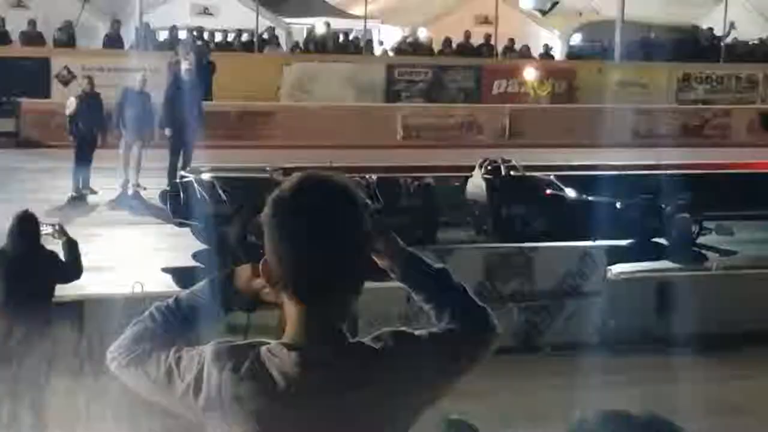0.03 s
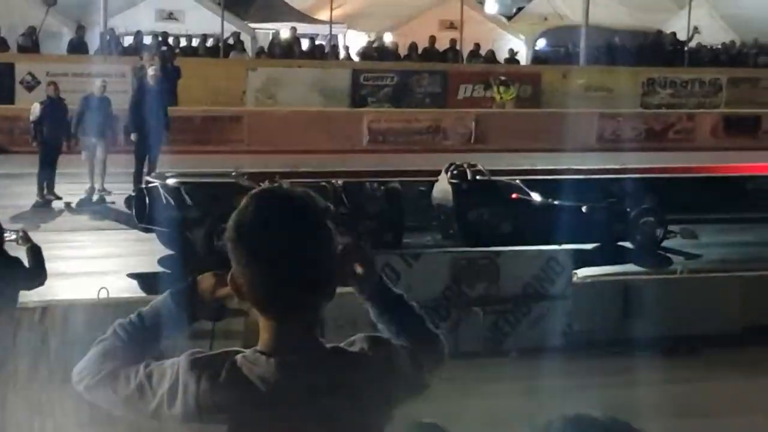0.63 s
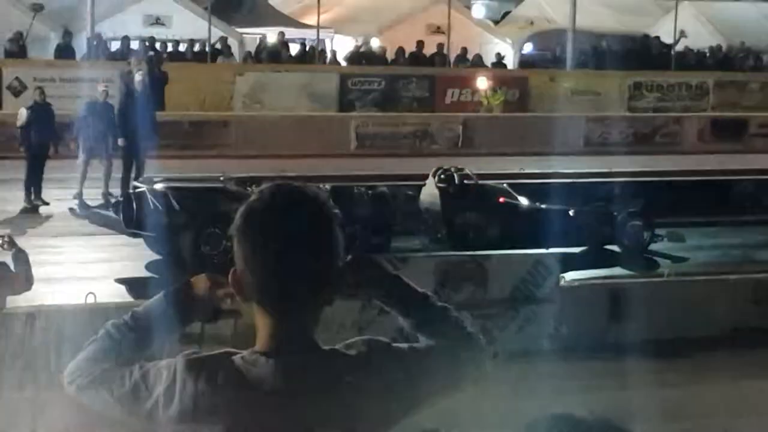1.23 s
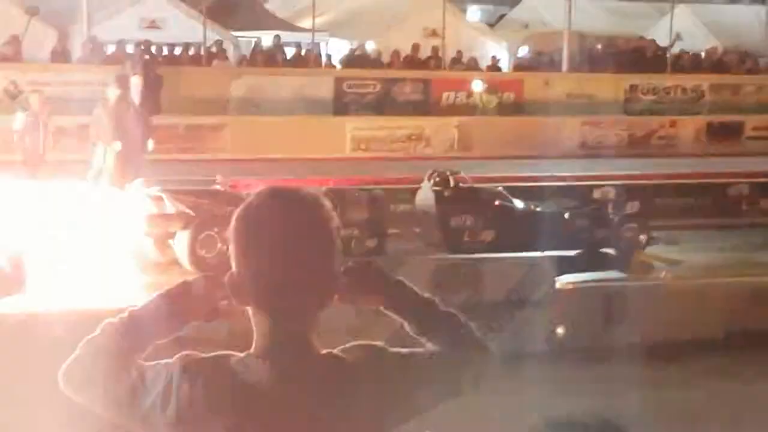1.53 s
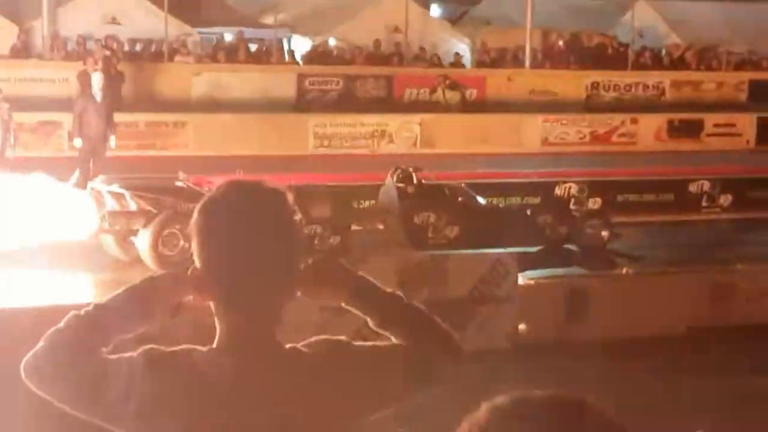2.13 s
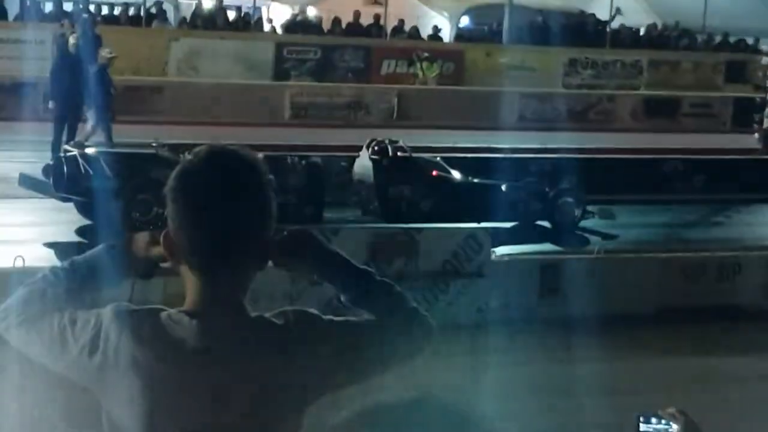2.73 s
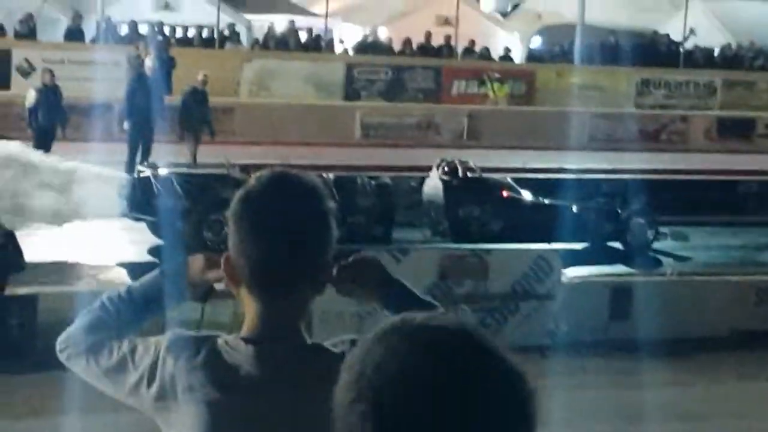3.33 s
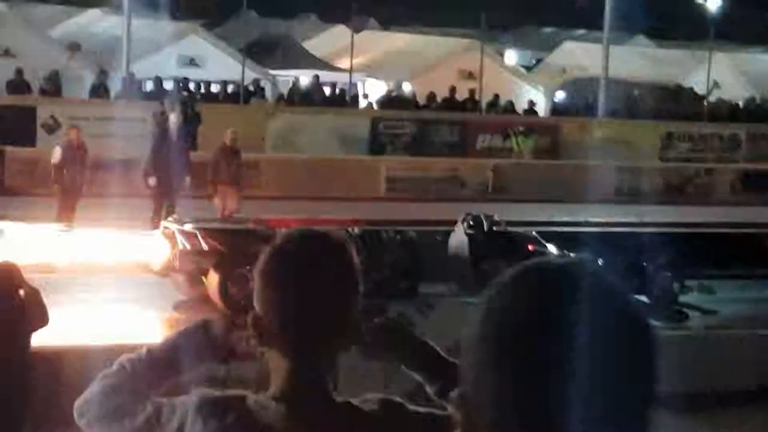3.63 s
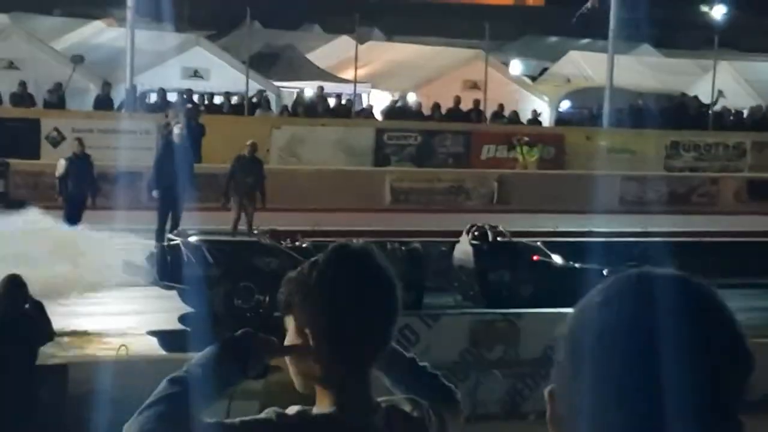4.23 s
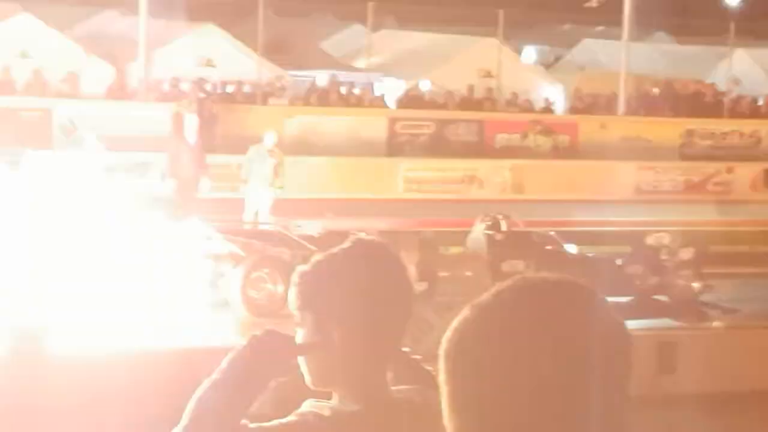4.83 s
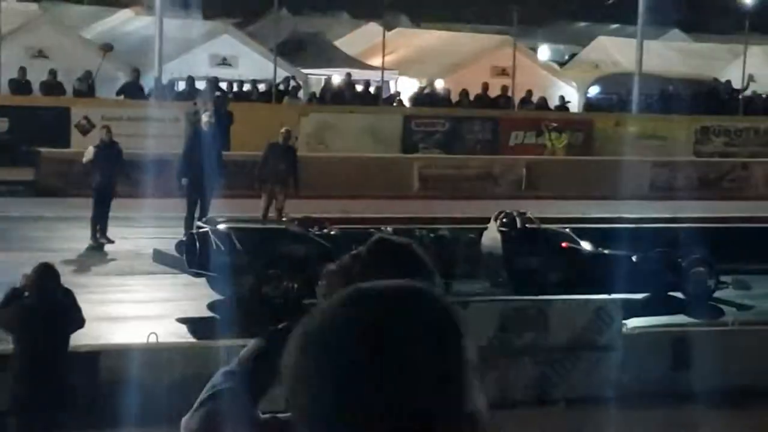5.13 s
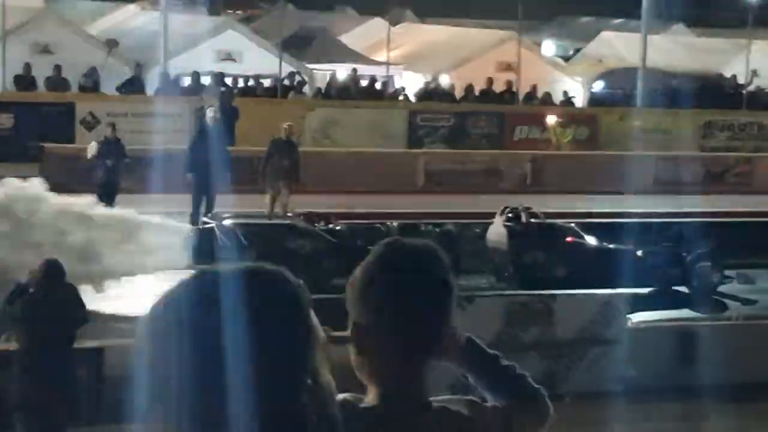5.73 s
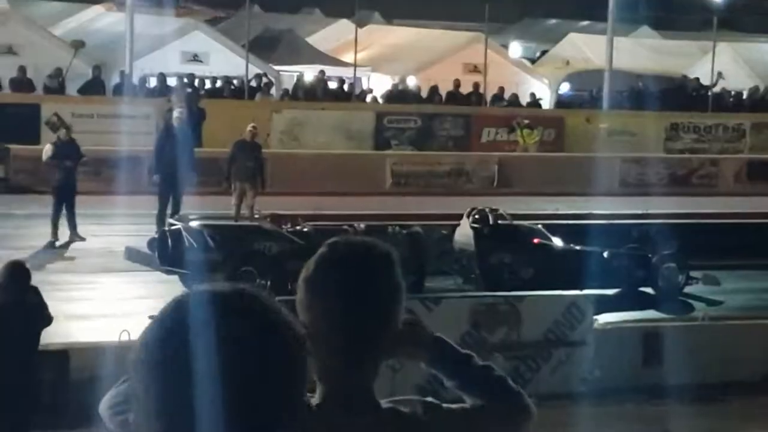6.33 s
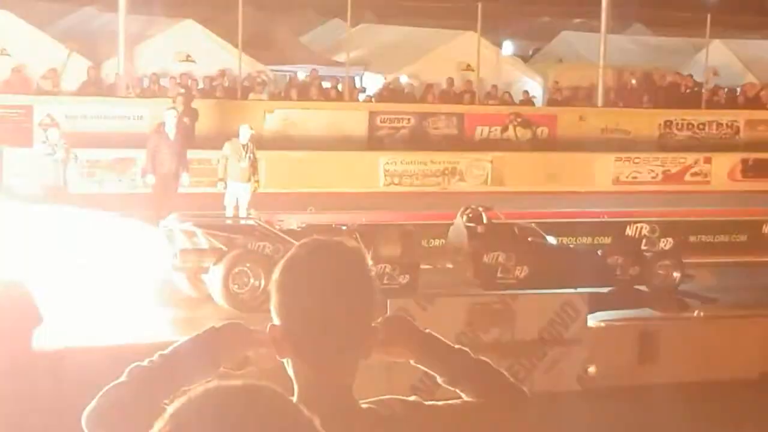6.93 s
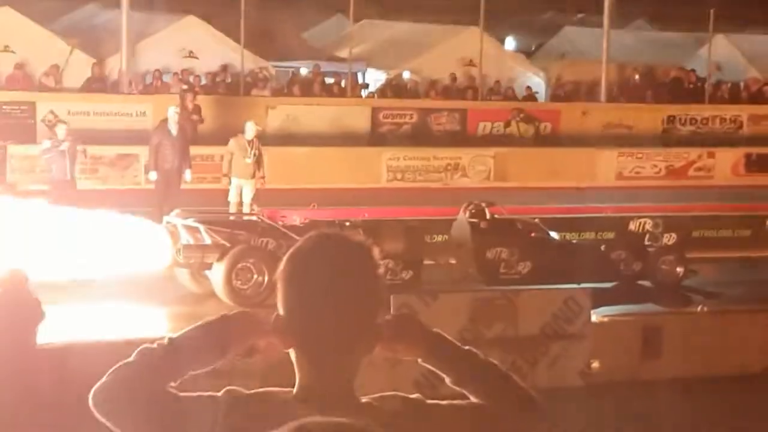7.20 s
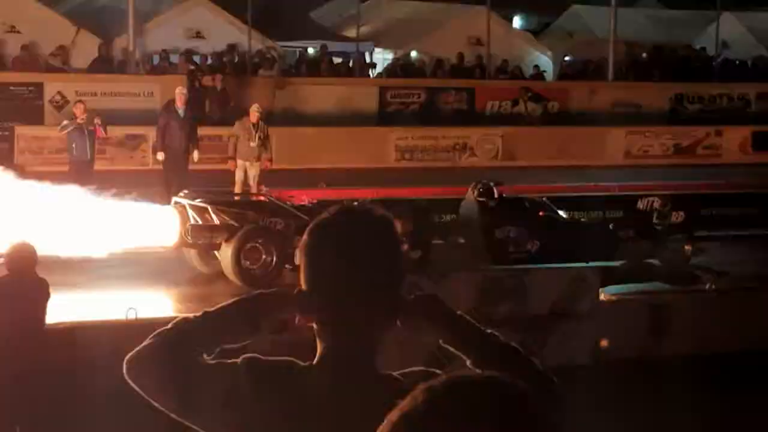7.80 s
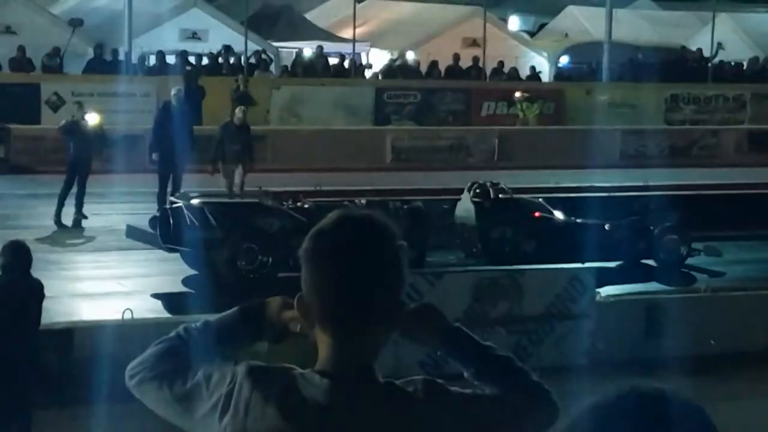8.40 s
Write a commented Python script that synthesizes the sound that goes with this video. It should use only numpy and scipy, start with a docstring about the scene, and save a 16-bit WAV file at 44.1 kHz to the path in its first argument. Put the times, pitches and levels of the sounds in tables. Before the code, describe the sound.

Repeated afterburner booms and throbbing bursts of flame interrupt the piercing whine and rushing exhaust of a jet car outdoors.

```python
"""A jet dragster on the start line at night, from a stereo microphone in the crowd behind the wall.
Its turbine blades whine over the hiss and roar of the exhaust mixing with still air. The afterburner
lights seven times with a bang and a fluttering flame that echoes off the stands; each burn drags the
shaft down. At the end the engine spools up. A limiter on the microphone ducks the bangs."""
import sys
import numpy as np
from scipy import signal
from scipy.fft import rfft, irfft, next_fast_len
from scipy.io import wavfile
from scipy.ndimage import uniform_filter1d, minimum_filter1d

SR = 44100
rng = np.random.default_rng(int(sys.argv[2]) if len(sys.argv) > 2 else 0)


def dump_mix(stems):
    """Bounce the given channels to the path in sys.argv[1] as a 16-bit WAV at rate SR."""
    frames = np.atleast_2d(stems).T  # one column per channel
    limited = np.clip(frames, -1, 1)  # hard clip at full scale
    pcm = np.round(limited * 32767).astype(np.int16)
    wavfile.write(sys.argv[1], SR, pcm)


N = 377496
TIME = np.arange(N) / SR
HZ = np.fft.rfftfreq(N, 1 / SR)


def amp(db):
    """Decibels to gain."""
    return 10 ** (np.asarray(db) / 20)


def read(points, hz):
    """Reads a spectrum on a log-frequency axis."""
    f, value = np.transpose(points)
    return np.interp(np.log(hz + 1), np.log(f + 1), value)


def curves(rows):
    """One control signal per column of a table of times."""
    time_s, *columns = np.transpose(rows)
    return [np.interp(TIME, time_s, column) for column in columns]


def between(first_s, last_s):
    """The samples between two times."""
    return slice(max(round(first_s * SR), 0), round(last_s * SR))


def wander(rate_hz):
    """Smooth random drift with an rms of 1, up to the given rate."""
    count = next_fast_len(N // 32 + 2)
    hz = np.fft.rfftfreq(count, 32 / SR)
    slow = irfft(rfft(rng.standard_normal(count)) / np.sqrt(1 + (hz / rate_hz) ** 4), count)
    drift = np.interp(np.arange(N) / 32, np.arange(count), slow)
    return drift / np.sqrt(np.mean(drift ** 2))


def split(spectrum, hz):
    """The sound below and above a frequency."""
    low = 1 / (1 + (HZ / hz) ** 8)
    return irfft(spectrum * low, N), irfft(spectrum * (1 - low), N)


# How alike the two sides of the microphone hear the car: freq_hz, coherence
MIC_COHERENCE = [(30, .99), (170, .99), (350, .93), (700, .91), (1400, .8), (2800, .66), (6000, .6),
                 (14000, .52)]
# How far the left side leads the right: freq_hz, phase_rad
MIC_PHASE = [(30, .1), (150, .2), (400, .5), (1100, .85), (2100, .3), (3500, 1.1), (6000, .3), (8000, 1.1),
             (14000, 1.2)]

def mic_noise(shape, band_hz):
    """Left and right spectra of noise at the microphone, with an rms of 1 inside the band."""
    left, apart = (rng.standard_normal(len(HZ)) + 1j * rng.standard_normal(len(HZ)) for _ in range(2))
    alike = np.clip(read(MIC_COHERENCE, HZ), 0, 1)
    right = (alike * left + np.sqrt(1 - alike ** 2) * apart) * np.exp(-1j * read(MIC_PHASE, HZ))
    pair = np.array([left, right]) * amp(read(shape, HZ))
    in_band = (HZ > band_hz[0]) & (HZ < band_hz[1])
    return pair / np.std(irfft(pair.mean(0) * in_band, N))


# The exhaust stream from behind the wall: time_s, level_db, roar_relative_db, fizz_relative_db
EXHAUST_LEVELS = [(.2, -31, -1.5, -1.5), (.9, -36, 0.5, -2), (1.15, -37.5, -1.5, -6), (1.5, -38, 0, -5),
                  (2.02, -41, 2.5, -7), (2.18, -34.5, -1.5, -6), (2.38, -36, 2.5, -4),
                  (2.5, -34.5, 3, -2.5), (2.65, -30.5, 0, -6), (3.45, -31.5, 3.5, -4), (3.85, -31.5, 1, -2),
                  (4.4, -31.5, 1.5, -3), (5.2, -35, 1.5, -4), (5.75, -32, 1.5, -3), (6.25, -34, 1, -1.5),
                  (6.55, -32.5, 2.5, -2), (7.5, -33.5, 0, -0.8), (8.1, -31, 2, -3), (8.5, -27.5, 7.5, -0.5)]
# Its eddies, from the largest to the smallest: freq_hz, density_db
HISS_SPECTRUM = [(1530, -41), (2600, -9), (2740, -11.5), (2960, -8), (3690, 0.5), (5350, -3), (5480, -5.5),
                 (5820, -4), (5950, -6), (6930, -5), (7540, -5), (8910, -13), (11000, -12.5),
                 (12000, -13.5), (16000, -18.5)]
IDLE_ROAR_SPECTRUM = [(120, -33), (220, -4.5), (300, -15.5), (420, -6.5), (520, -2.5), (640, -4),
                      (720, -5.5), (1000, -4), (1150, -7.5), (1420, 3.5), (1650, -12.5), (2100, -11.5),
                      (2900, -20), (3900, -56)]
FULL_ROAR_SPECTRUM = [(120, -15), (200, -4.5), (265, -7), (408, -6.5), (479, -3), (621, 1.5), (696, -6.5),
                      (779, 0.5), (892, -4.5), (1210, 0.5), (1590, -0.5), (2470, -8.5), (2900, -17.5),
                      (3000, -27.5), (3900, -49), (6600, -120)]
RUMBLE_SPECTRUM = [(15, -24), (40, -15), (65, -1), (88, 7.5), (115, -1.5), (160, -10.5), (230, -6.5),
                   (330, -20.5), (700, -69)]

def exhaust(speed, swell_db, dip_db, gust_db=0.9, churn_db=1.2):
    """The jet mixes with still air: small eddies hiss, larger ones roar, the largest rumble."""
    level_db, roar_db, fizz_db = curves(EXHAUST_LEVELS)
    hiss, fizz = split(mic_noise(HISS_SPECTRUM, (3200, 5300)), 8700)
    idle = irfft(mic_noise(IDLE_ROAR_SPECTRUM, (1100, 2400)), N)
    deep, bright = split(mic_noise(FULL_ROAR_SPECTRUM, (1100, 2400)), 1150)
    rumble = irfft(mic_noise(RUMBLE_SPECTRUM, (20, 300)), N)
    # the roar broadens as the shaft leaves idle, then loses depth as it spools up
    off_idle = np.clip((speed - 232.4) / 1.8, 0, 1)
    spool_up = np.clip((speed - 236) / 8, 0, 1)
    full = bright + deep * amp(-4 * spool_up)
    roar = np.sqrt(1 - off_idle) * idle + np.sqrt(off_idle) * full
    fizz = fizz / np.std(fizz.mean(0)) * amp(fizz_db - 0.7)
    fine = (hiss + fizz) * amp(gust_db * wander(34) - dip_db)
    coarse = roar * amp(roar_db - 2 + churn_db * wander(26))
    stream = amp(level_db + swell_db) * track_bounce(fine + coarse)
    return stream + amp(-34.5 - 1.5 * off_idle) * rumble


def track_bounce(jet, delay_s=0.001126, drift_s=0.00021, strength=0.15):
    """A reflection off the track colours the jet; moving hot air shifts its delay."""
    lag = (delay_s + drift_s * wander(1.2)) * SR
    echo = np.array([np.interp(np.arange(N) - lag, np.arange(N), side) for side in jet])
    return (jet + strength * echo) / np.hypot(1, strength)


def blade_tone(turns, order, fading, scatter, fade_hz, scatter_hz=60):
    """One blade row: hot moving air on the way to the microphone makes its tone fade and smear."""
    count = N // 64 + 2
    hz = abs(np.fft.fftfreq(count, 64 / SR))
    core = fading / np.sqrt(fade_hz * (1 + (hz / fade_hz) ** 4))
    skirt = scatter / np.sqrt(scatter_hz * (1 + (hz / scatter_hz) ** 4))
    paths = np.fft.ifft((core + skirt) * np.exp(2j * np.pi * rng.random((2, count))))
    paths *= np.hypot(fading, scatter) / np.std(paths)
    paths += np.exp(1j * np.array([[.5], [-.5]]))  # the steady direct path, left ahead of right
    waver = np.array([np.interp(np.arange(N) / 64, np.arange(count), path) for path in paths])
    tone = (waver * np.exp(2j * np.pi * (order * turns + rng.random()))).real
    return tone / np.std(tone.mean(0))


# The piercing whistle at twice the blade rate, and the 12-blade tone an octave below it, as they reach the
# crowd: time_s, level_db
HIGH_WHISTLE = [(.25, -40), (.43, -31.5), (.93, -40.5), (1.05, -44), (1.98, -49), (2.22, -33.5),
                (2.5, -44.5), (3.3, -37), (4.1, -34), (4.8, -35.5), (5.25, -36), (5.75, -32), (6.15, -33),
                (6.52, -28), (6.8, -43), (7.5, -35), (8.25, -34), (8.5, -33.5)]
OCTAVE_BELOW = [(.3, -40), (.5, -46), (.86, -38), (1.02, -52), (2, -51.5), (2.65, -47), (3.28, -37.5),
                (3.55, -46), (4.1, -37.5), (4.65, -44.5), (5.35, -37.5), (5.85, -48.5), (6.15, -39),
                (6.8, -43.5), (7.5, -36.5), (8.5, -40.5)]
# The other strong blade tones: passes_per_turn
STRONG_ORDERS = [31, 33, 48]
# For each of them: level_db, dip_multiple, rise_db_per_shaft_hz
STRONG_LEVELS = [(-40, 2.5, 0), (-39.5, 1.4, 0), (-41.5, 1.3, 1.8)]
# Fainter compressor stages and their overtones: passes_per_turn
FAINT_ORDERS = [34, 36, 43, 46, 55, 57, 60, 66, 67]
# For each of them: level_db, rise_db_per_shaft_hz
FAINT_LEVELS = [(-51, 0.78), (-44, -0.26), (-54.5, -1.9), (-46, 0), (-47.5, 2), (-60, 0), (-48, -.8),
                (-46, 2), (-51, 0)]

def turbine(speed, swell_db, dip_db, usual_shaft_hz=234.5):
    """Every blade row sings at a whole multiple of the shaft speed."""
    turns = np.cumsum(speed * (1 + .00015 * wander(12))) / SR
    extra_hz = np.minimum(speed - usual_shaft_hz, 2)
    high_db = curves(HIGH_WHISTLE)[0] + .5 + .5 * swell_db - .69 * dip_db
    low_db = curves(OCTAVE_BELOW)[0] - 1.6
    whine = amp(high_db) * blade_tone(turns, order=24, fading=.85, scatter=.38, fade_hz=13)
    whine += amp(low_db) * blade_tone(turns, order=12, fading=.5, scatter=.17, fade_hz=9)
    # the upper tones rise and fall with the exhaust's fizz, and sink into the hiss at the spool-up
    stream_db, _, fizz_db = curves(EXHAUST_LEVELS)
    top_db = stream_db + fizz_db - np.median(stream_db + fizz_db)
    top_db -= 6 * np.clip((speed - 237) / 4, 0, 1)
    for order, (level_db, dip_multiple, rise) in zip(STRONG_ORDERS, STRONG_LEVELS):
        tone = blade_tone(turns, order, fading=1.0, scatter=0.019 * order, fade_hz=7)
        whine += amp(level_db + top_db - dip_multiple * dip_db + rise * extra_hz) * tone
    for order, (level_db, rise) in zip(FAINT_ORDERS, FAINT_LEVELS):
        tone = blade_tone(turns, order, fading=1.7, scatter=1.05, fade_hz=11)
        whine += amp(level_db + top_db - dip_db + rise * extra_hz) * tone
    return whine


# The fuel cloud catching behind the car: freq_hz, density_db
CRACK_SPECTRUM = [(100, -25), (250, 0), (500, 4), (800, -12), (1500, -8), (2500, -21.5), (6000, -60)]
FIREBALL_SPECTRUM = [(10, -22), (30, 16.5), (60, -48), (85, 19), (125, 22), (200, -25), (600, -61)]
# The seven afterburner shots on the start line: start_s, fuel_off_s, shaft_drag_hz, flame_db, rasp_db,
# flare_db, hiss_swell_db, hiss_dip_db, tear_db, bang_db, bang_pitch_hz, fireball_db, crack_db
BURN_EVENTS = [(0.235, 0.388, 7.4, -11.5, -26, 2, -1.7, -0.5, -25, 8.5, 99, -14, -19.5),
               (0.958, 1.107, 10, -17.5, -30.5, -2, .3, 4.5, -47, 2, 109, -19, -22),
               (1.551, 2.319, 9, -17, -32, 8, 3.5, -0.5, -44, -12, 100, -28, -28),
               (3.582, 3.727, 14, -10.5, -23, -3, 5.5, 2, -19, 10, 105.8, -18, -3.5),
               (4.837, 5.021, 11, -13.5, -24, -3, 4, 1, -24, 8, 93.2, -13, -9.5),
               (5.871, 6.026, 9.6, -16, -30, 1, -2.5, 4.5, -28, 9, 121, -20, -13),
               (6.705, 7.919, 4.04, -17, -27.5, 7.5, 1.2, 3.5, -51, 8, 131.2, -17.5, -10.5)]

def ignitions(swell_s=0.0031, fireball_s=0.16, catch_s=0.0068, crack_s=0.0097):
    """Each fuel cloud catches with a crack, then a few heavy pressure swings and a rolling fireball."""
    rolling = irfft(mic_noise(FIREBALL_SPECTRUM, (10, 200)), N)
    crack = irfft(mic_noise(CRACK_SPECTRUM, (200, 3000)), N)
    bangs, fireballs = np.zeros(N), np.zeros((2, N))
    for start_s, *_, bang_db, pitch_hz, fireball_db, crack_db in BURN_EVENTS:
        span = between(start_s - .1, start_s + .5)
        t = np.maximum(TIME[span] - start_s, 0)
        rise = t / swell_s
        bangs[span] += amp(bang_db) * rise ** 2 * np.exp(2 - 2 * rise) * np.sin(2 * np.pi * pitch_hz * t)
        billow = (1 - np.exp(-rise)) * np.exp(-(t / fireball_s) ** 2)
        fireballs[:, span] += amp(fireball_db) * billow * rolling[:, span]
        # the flame front races through the cloud just ahead of the bang
        ahead_s = np.maximum(start_s - TIME[span], 0)
        fireballs[:, span] += amp(crack_db) * np.exp(-ahead_s / catch_s - t / crack_s) * crack[:, span]
    return bangs, fireballs


# The burning plume and the ringing tailpipe, heard over the wall: freq_hz, density_db
FLAME_SPECTRUM = [(20, -33), (35, -22), (55, -8), (85, -5.5), (130, 1.5), (165, -3.5), (195, -9),
                  (228, -5.5), (280, -13.5), (350, -16), (440, -16), (540, -14), (630, -16), (760, -19.5),
                  (1000, -21), (1450, -23.5), (2600, -42.5), (6000, -92)]
TAILPIPE_SPECTRUM = [(300, -45), (540, -14), (635, 5), (730, -23), (1200, -53)]

def flame(light_s=0.0043, die_s=0.019, surge_s=0.05, flare_s=0.047, ring_build_s=0.14):
    """Burning fuel throbs in the plume; rasp rides on the pressure crests and the tailpipe rings."""
    body, rasp = split(mic_noise(FLAME_SPECTRUM, (40, 350)), 320)
    power = uniform_filter1d(body.mean(0) ** 2, size=1800)
    body = body / (power + .02) ** .4  # a steady fuel flow evens out the throb
    rasp = rasp * np.exp(.18 * np.tanh(body.mean(0)) + .082 * wander(210))
    body, rasp = body / np.std(body.mean(0)), rasp / np.std(rasp.mean(0))
    pipe = irfft(mic_noise(TAILPIPE_SPECTRUM, (400, 900)), N)
    plume = np.zeros((2, N))
    for start_s, off_s, _, flame_db, rasp_db, flare_db, *_ in BURN_EVENTS:
        span = between(start_s, off_s + .5)
        t, remaining_s = TIME[span] - start_s, off_s - TIME[span]
        lit = np.clip(t / light_s, 0, 1) * np.exp(np.minimum(remaining_s, 0) / die_s)
        # the flame surges as it lights, breaks up into rasp, and flares or sags just before fuel off
        surge_db = 4 * np.exp(-t / surge_s)
        breakup_db = 2.5 * np.exp(-((t - .077) / .046) ** 2)
        ending_db = flare_db * np.exp(-abs(remaining_s - .024) / flare_s)
        ring = amp(-5) * (1 - np.exp(-t / ring_build_s)) * pipe[:, span]
        plume[:, span] += lit * amp(flame_db + surge_db + ending_db) * body[:, span]
        plume[:, span] += lit * amp(rasp_db + breakup_db + .99 * ending_db) * (rasp[:, span] + ring)
    return amp(-.5) * plume


def hiss_swell_and_dip(swell_s=0.099, dip_s=0.004, recover_s=0.25):
    """Decibels by which the hiss swells just before each burn and dips during it; negatives reverse it."""
    swell, dip = np.zeros(N), np.zeros(N)
    for start_s, off_s, _, _, _, _, swell_db, dip_db, *_ in BURN_EVENTS:
        span = between(start_s - .5, off_s + 1)
        t = TIME[span]
        unlit = np.exp(-np.maximum(t - start_s, 0) / dip_s)
        swell[span] += swell_db * unlit * np.exp(-np.maximum(start_s - t, 0) / swell_s)
        dip[span] += dip_db * (1 - unlit) * np.exp(-np.maximum(t - off_s, 0) / recover_s)
    return swell, dip


# The speed that the throttle asks for: time_s, shaft_hz
THROTTLE_SPEED = [(.1, 232.23), (2.4, 234.78), (3.2, 235.79), (6.6, 237.57), (8.18, 237.92), (8.33, 239.68),
                  (8.56, 248.46)]

def shaft_speed(inertia_s=.8, lag_s=.02):
    """Turns per second: each burn drags the heavy shaft below the speed asked for; it slowly recovers."""
    speed, t = curves(THROTTLE_SPEED)[0], TIME - lag_s
    for start_s, off_s, drag_hz, *_ in BURN_EVENTS:
        sag = 1 - np.exp(-np.clip(t - start_s, 0, off_s - start_s) / inertia_s)
        speed -= drag_hz * sag * np.exp(-np.maximum(t - off_s, 0) / inertia_s)
    return speed


# How long the walls and stands around the microphone reverberate: freq_hz, t60_s
STANDS_DECAY = [(40, 1.35), (120, 0.76), (400, 0.72), (1500, 0.55), (8000, 0.33)]

def stands_echo(sound, gap_s=0.027):
    """Scattered echoes from walls and stands; the bass lingers longest and reaches both sides alike."""
    onset = np.clip(np.arange(SR) / SR / gap_s - 1, 0, 1)
    taps = rng.standard_normal((2, SR)) * (rng.random((2, SR)) < 1 / 20) * onset
    hz, time_s, spectra = signal.stft(taps, SR, nperseg=512)
    width = np.array([np.ones(len(hz)), np.sqrt(1 - read(MIC_COHERENCE, hz))])[:, :, None]
    decay = amp(-60 * time_s / read(STANDS_DECAY, hz)[:, None])
    mid, side = signal.istft(spectra * width * decay, SR, nperseg=512)[1]
    tail = np.array([mid + side, mid - side]) / np.linalg.norm(mid)
    return signal.fftconvolve(sound.mean(0)[None], tail, axes=1)[:, :N]


# The flame front breaking up behind the car: freq_hz, density_db
TEAR_SPECTRUM = [(250, -19), (500, 1), (850, -4), (1500, -6.5), (2500, -10), (6000, -40)]

def tearing(delay_s=0.0625, rise_s=0.0022, fade_s=0.041, ragged_db=3):
    """Just after each bang the flame front tears open in a ragged, bright crackle."""
    crackle = irfft(mic_noise(TEAR_SPECTRUM, (300, 3000)), N) * amp(ragged_db * wander(140))
    level = np.zeros(N)
    for start_s, *_, tear_db, _, _, _, _ in BURN_EVENTS:
        span = between(start_s, start_s + .5)
        t = np.maximum(TIME[span] - start_s - delay_s, 0)
        level[span] += amp(tear_db) * np.minimum(t / rise_s, 1) * np.exp(-t / fade_s)
    return level * crackle


def scene():
    """The engine, the afterburner and its echoes as they arrive behind the wall."""
    speed = shaft_speed()
    swell_db, dip_db = hiss_swell_and_dip()
    bangs, fireballs = ignitions()
    fire = flame() + tearing() + fireballs
    engine = exhaust(speed, swell_db, dip_db) + turbine(speed, swell_db, dip_db)
    return engine + fire + bangs + amp(-17) * stands_echo(fire + amp(-6) * bangs)


# The balance between the two sides of the microphone: freq_hz, left_minus_right_db
MIC_BALANCE = [(60, -2.5), (120, -0.8), (240, -2.1), (480, -0.3), (950, 0.3), (1890, 0.68), (3770, -0.6),
               (7520, -2.0), (15000, 0.5)]

def record(dry, start_s=.105, boost_db=9.0, release_db_per_s=400, cutoff_hz=15780):
    """Microphone gain starts high until the first boom pulls it down for good; a limiter ducks bangs."""
    balance = amp(np.array([[.5], [-.5]]) * read(MIC_BALANCE, HZ))
    mic = irfft(rfft(dry) * balance, N)
    mic *= np.clip((TIME - start_s) * SR / 100, 0, 1)  # silence, then a 100-sample fade-in
    peak_db = 20 * np.log10(-minimum_filter1d(-abs(mic).max(0), size=160) + 1e-6)
    gain_db = np.interp(np.maximum.accumulate(peak_db), [-9, -5], [boost_db, 0])
    release_db = TIME * release_db_per_s
    over_db = np.maximum(np.maximum.accumulate(peak_db + gain_db + release_db) - release_db, 0)
    limited = mic * amp(uniform_filter1d(gain_db - over_db, size=120))
    lowpass = signal.firwin(1023, cutoff_hz, window=("kaiser", 9), fs=SR)
    return signal.oaconvolve(limited, lowpass[None], "same")


dry = scene()
out = record(dry)
dump_mix(out)
```